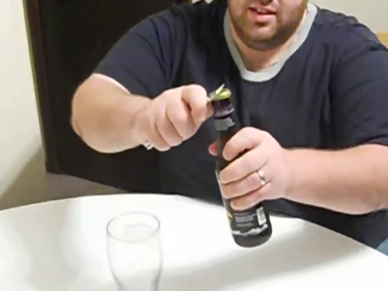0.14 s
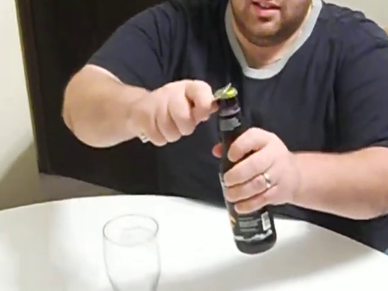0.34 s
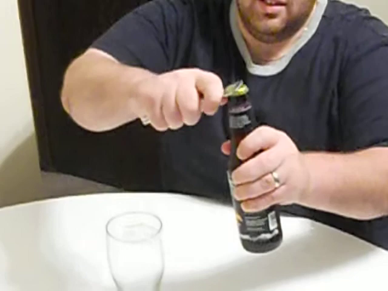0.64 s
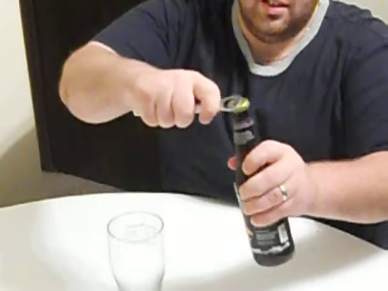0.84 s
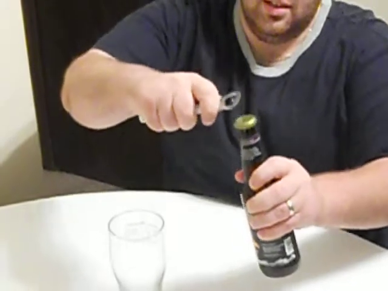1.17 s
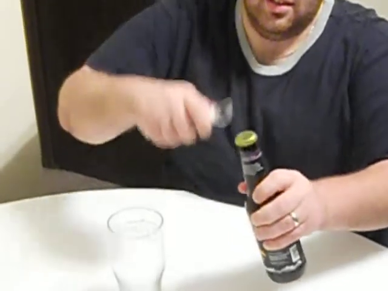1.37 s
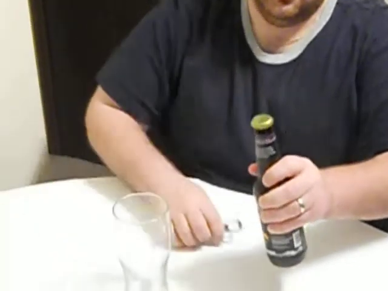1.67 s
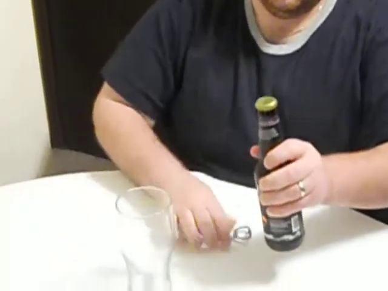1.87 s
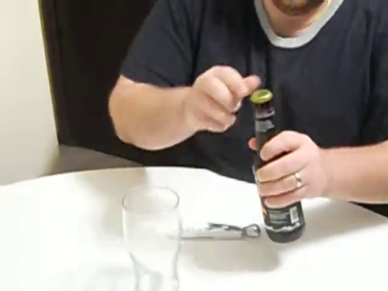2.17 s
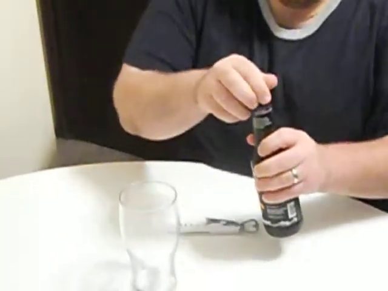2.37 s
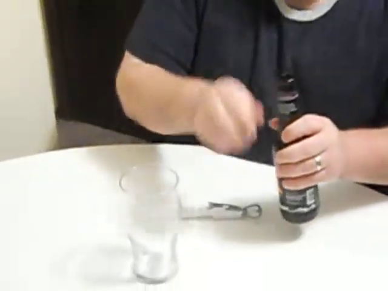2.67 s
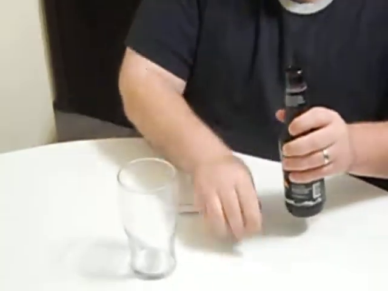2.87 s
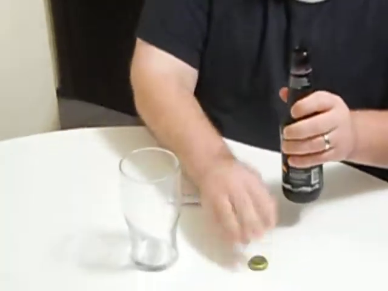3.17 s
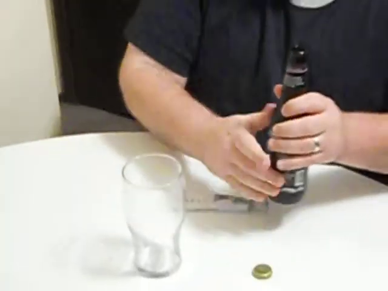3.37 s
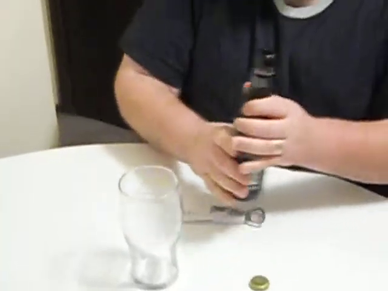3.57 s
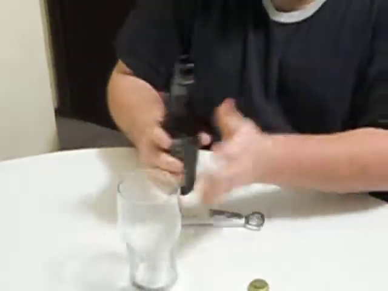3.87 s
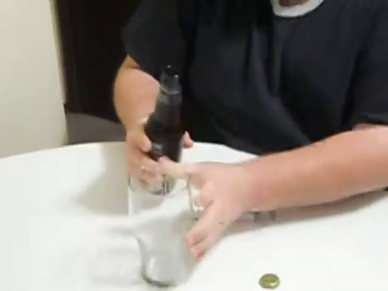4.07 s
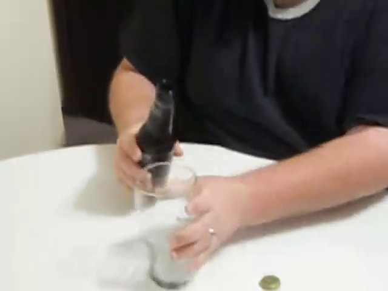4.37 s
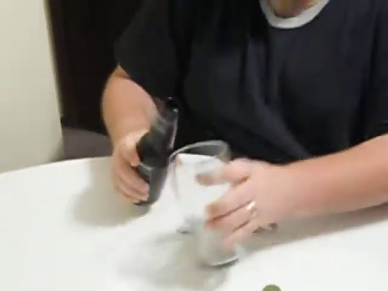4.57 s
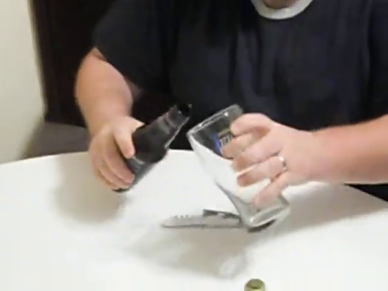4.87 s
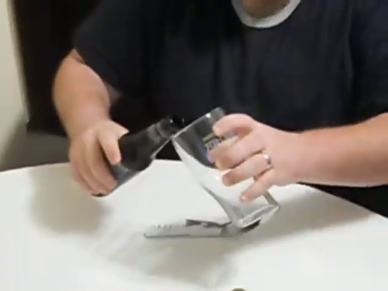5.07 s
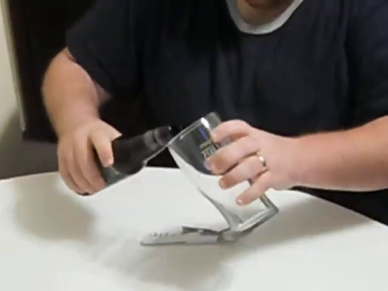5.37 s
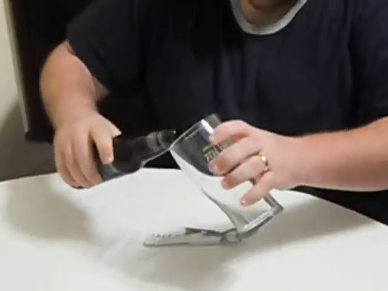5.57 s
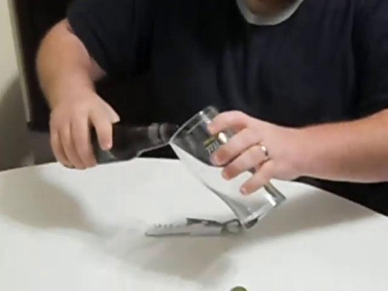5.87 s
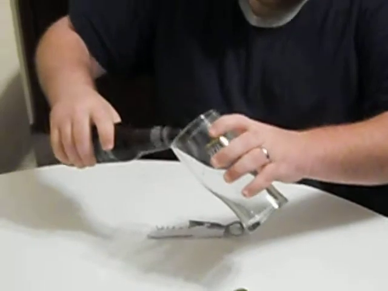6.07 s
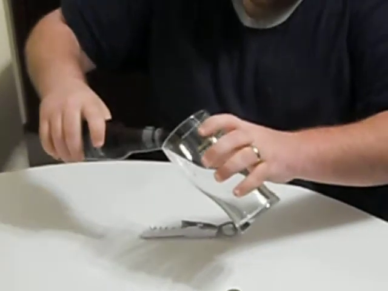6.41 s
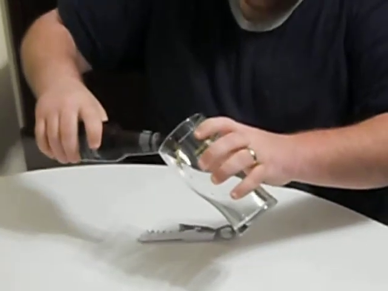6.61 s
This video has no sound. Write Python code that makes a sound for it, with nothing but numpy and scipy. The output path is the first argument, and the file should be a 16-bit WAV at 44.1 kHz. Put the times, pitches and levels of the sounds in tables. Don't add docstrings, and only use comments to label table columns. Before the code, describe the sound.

Close in a small hard room, gas hisses from a bottle in a slow leak, then a sharper burst, followed by a metallic snap and small hollow pop. The steel opener clacks loudly on the table twice, the cap lands with bright bouncing tinks, a glass scrapes faintly, bottle neck clinks on its rim, and a very faint trickle begins over hum and hiss.

```python
import sys
import numpy as np
from scipy import signal
from scipy.fft import rfft, irfft, next_fast_len
from scipy.io import wavfile
from scipy.ndimage import uniform_filter1d

SR = 44100
rng = np.random.default_rng(int(sys.argv[2]) if len(sys.argv) > 2 else 0)


def pcm_store(signal):
    levels = np.round(np.clip(np.atleast_2d(signal), -1, 1) * 32767)
    wavfile.write(sys.argv[1], SR, levels.astype(np.int16).T)


def ratio_of_db(decibels):
    return 10 ** (np.asarray(decibels, float) / 20)


N = 297366

# (time [s], level [dB])
LEAK = [(0, -55), (.01, -27.5), (.039, -29), (.043, -21), (.102, -24.5), (.2, -22), (.238, -19),
        (.356, -27.5), (.39, -37)]
# (time [s], level [dB])
BURST = [(.401, -44), (0.41, -19), (.437, -11.5), (.47, -15), (.51, -41), (.54, -68)]
# (frequency [Hz], density [dB per Hz])
GAS_COLOUR = [(410, -54.5), (700, -24), (1780, -18.5), (2520, -23.5), (5010, -11), (5360, -13), (6420, -10),
              (6870, -10.5), (7350, -9.5), (10300, -5.5), (13400, -33), (22000, -120)]
# (frequency [Hz], width [Hz], level over the jet [dB])
NECK_PIPE = [(1682, 350, 3), (5000, 170, 1.5), (5740, 210, 5), (6430, 250, 3.5), (7335, 380, 9.5),
             (8170, 350, 4), (8940, 200, 5), (9670, 220, 2.5), (10440, 290, 9), (11570, 160, 2)]
LEAK_TILT_DB, LEAK_DULLEST_S, LEAK_BRIGHTENS_DB_PER_S = -1.5, 0.14, 27.5
BURST_TILT_DB = 1.5

# (time [s], first pitch [Hz], last pitch [Hz], level [dB], hold [s])
POP = [
    (0.725, 735, 863, -17.5, 0.016),
    (0.776, 1030, 890, -32, 0.023),
    (1.001, 859, 806, -40, 0.019),
]
POP_ATTACK_S, POP_FALL_DB_PER_S = 0.0052, 941.5

# (time [s], peak [dB], contact [ms], ring over crack [dB], tilt [dB per octave])
LEVER_CONTACTS = [(.7232, -11, 9.3, -8, 0.5), (.7258, -9.5, 4.3, 8.5, -5), (.7328, -9, 3.64, -21, 1),
                  (.7355, -4, 1.6, -9, 2.5), (.7474, -26, 3.4, -17, 13), (.7775, -16, 3.5, 1, 19),
                  (.8005, -14.5, 2.8, 15, -8)]
PRISE_CONTACTS = [(.7895, -15.5, 8.4, -4, -0.5), (.7945, -18, 12, 4, 4), (.8005, -9.5, 4.9, 12, 9),
                  (.8074, -18, 2.1, -3, 5), (.815, -15, 2.4, -9, 0)]
SETTLE_CONTACTS = [(.9957, -30.5, 2.8, 2, -0.5), (1.019, -27.5, 2, 10, 2.5), (1.0394, -31.5, 3.4, 8, 1)]
OPENER_CONTACTS = [(1.5765, -26.5, 4.3, -23, 3), (1.6368, -12, 2, -11.5, -0.7),
                   (1.6465, -16, 0.59, -11, -4.5), (1.701, -27, 23, -11, -8.5),
                   (1.7085, -20.5, 5.4, 2, 2.5), (1.7178, 2.5, 0.65, -28, 4), (1.7205, -5, 1.9, -8, 12.5),
                   (1.7265, -10.5, 3.1, -29.5, 5), (1.7415, -40.5, 1.4, -6, 5),
                   (1.8472, 1.5, 1.2, -36, 2.5), (1.850, 3.5, 2.3, -26, 5.5), (1.853, -7.5, 2.3, -37.5, -2),
                   (1.8605, -11, 1.4, -29, -3.5), (1.8765, -11, 2, -5, 6.5)]
CAP_CONTACTS = [(3.0856, 1.5, .05, 22, -6), (3.0957, -1.5, .05, 18, -2), (3.1046, -6, .05, 16, -3),
                (3.1114, -15, .3, 9, 3), (3.1368, -11, .08, 3, 12), (3.1528, -14, .08, 5, 8),
                (3.1604, -21, .1, 4, 3), (3.168, -24, .1, 4, 0), (3.1774, -26, .1, 5, 0),
                (3.19, -28, .1, 16, 4)]
DRAG_CONTACTS = [(4.2305, -20.5, 3.3, -6, 1), (4.2395, -19.5, 4.7, -10, -3), (4.246, -20.5, 2.7, -2, -7),
                 (4.258, -23, 6.2, -18, -3.5), (4.271, -26.5, 7.9, -1, 2.5), (4.298, -32, 6.1, -8, 2),
                 (4.307, -29, 4.6, -2, -11), (4.329, -34, 6.9, -10, -8)]
CLINK_CONTACTS = [(5.2558, -9, 2.5, 5, 0), (5.263, -11.5, 3.2, 1, -1), (5.269, -9.5, 3.8, 3, 0),
                  (5.2745, -11, 4, 1, -1), (5.281, -15, 4.6, 2, -2), (5.293, -19, 5, 6, -1),
                  (5.3445, -23, 6, 8, -2)]

# (frequency [Hz], level [dB], t60 [s])
LEVER_MODES = [(2450, -13, .05), (3050, -5, .12), (3163, 0, .05), (3280, -4, .11), (5529, -9, .05),
               (5850, -12, .05), (6450, -12, .05), (7400, -12, .04), (8250, -11, .08)]
CAP_ON_NECK_MODES = [(3075, -1, .4), (3340, -8, .15), (2466, -16, .2), (4790, -17, .15), (4990, -9, .13),
                     (5400, -18, .14), (6440, -18, .08), (8240, -20, .2), (8535, -5, .12), (8915, -2, .2),
                     (9216, -6, .14), (9600, -13, .15), (9880, -18, .13), (10300, -20, .04)]
FREE_CAP_MODES = [(3100, -5, .14), (3400, -6, .04), (4790, -12, .12), (4990, 0, .2), (6200, -6, .06),
                  (8300, -8, .1), (8800, -6, .1), (9250, -9, .08)]
OPENER_MODES = [(1200, -14, .1), (1700, -13, .1), (4350, -10, .06), (5150, -11, .07), (6800, -18, .07),
                (3200, -10, .08), (9950, -14, .08)]
CAP_MODES = [(3560, -34, .2), (4070, -26, .22), (4370, -28, .2), (4580, -19, .22), (4956, 0, .15),
             (4935, -15, .3), (5064, -15, .33), (7275, -29, .2), (8270, -18, .14), (8672, -14, .24),
             (8750, -13, .08), (8850, -23, .15), (10180, -30, .12), (11870, -27, .14)]
TABLE_MODES = [(402, -6, 0.39), (506, -37, 4.15), (649, -1, 0.33), (723, -2, 0.16), (960, -3, 0.3),
               (1136, -18, 0.16), (1450, -2, 0.19), (1610, -35, 5.0)]
GLASS_MODES = [(554, -8, .45), (1352, -1, .6), (1520, -8, .2), (1815, -9, .3), (2094, -10, .3),
               (2509, -9, .3), (2993, -3, .35), (3284, -3, .25), (3430, 2, .33), (4274, -6, .25),
               (4592, -7, .5), (5120, -6, .25), (7144, 2, .16), (8075, -11, .25), (9350, -13, 0.08),
               (1050, -7, 0.15)]

# (frequency [Hz], density [dB per Hz])
PRISE_CRACK = [(240, -57), (400, -33), (811, -8), (1540, -16.5), (2870, -19.5), (3200, 1), (4030, -14.5),
               (8400, -18), (10300, -50.5), (13400, -57), (22000, -120)]
OPENER_CRACK = [(88, -63), (150, -22.5), (509, -8.5), (596, -12), (1660, -8), (2500, -15.5), (4410, -4.5),
                (7100, -7.5), (10300, -16.5), (13400, -44), (22000, -120)]
CAP_CRACK = [(300, -65), (700, -27), (1200, -22.5), (2500, -21.5), (4700, 16), (7000, 9.5), (9000, -8.5)]
TABLE_CRACK = [(71, -74), (120, -13.5), (459, -5), (637, -5), (781, -6), (987, -6.5), (2090, -33),
               (5000, -50), (6500, -70), (11000, -120)]
GLASS_CRACK = [(180, -59), (300, -9), (937, -11), (1380, 10), (2310, -3.5), (3350, -8), (5620, -4),
               (7220, -5), (10300, -14), (13400, -59), (22000, -120)]

# (time [s], peak [dB], centre [Hz])
TICKS = [(1.3467, -38, 5630), (1.397, -37.5, 4840), (1.424, -39, 5000), (1.637, -13.5, 3060),
         (1.645, -22.5, 2550), (1.707, -15, 3550), (2.074, -43, 1070), (3.34, -45, 5000),
         (4.4078, -33.5, 3180), (5.8298, -24.5, 1050), (5.831, -34, 5350), (5.845, -31, 4200),
         (5.899, -30, 2800), (5.888, -41, 3300), (5.908, -23.5, 2500), (5.9078, -20.5, 900),
         (6.5175, -30, 1020)]
# (time [s], peak [dB], centre [Hz])
TINKS = [(0.056, -19, 8600), (1.7175, -16.5, 4140), (2.313, -50.5, 5000), (2.3136, -45, 3280),
         (5.882, -33, 8900)]
# (time [s], peak [dB], pitch [Hz])
GLUGS = [(6.395, -39, 1150)]
# (time [s], peak [dB], centre [Hz], length [ms])
RUBS = [(.0415, -34, 6100, 8.7), (1.2405, -30.5, 2700, 19), (1.251, -29.5, 1070, 11),
        (2.128, -45, 2460, 16), (3.15, -29, 3760, 44), (3.09, -23.5, 1160, 16), (3.099, -17, 4200, 24),
        (1.862, -25, 1500, 15), (3.59, -50, 5960, 32), (4.229, -44, 1500, 25), (4.295, -39, 1600, 20),
        (4.296, -39.5, 4800, 18), (4.372, -35.5, 3600, 15), (4.386, -30.5, 1060, 19),
        (4.396, -40, 1200, 12), (.733, -5, 6570, 4.2), (5.265, -20, 1900, 18), (4.315, -30.5, 600, 18),
        (5.258, -23, 2800, 34), (5.872, -29, 2530, 20), (5.903, -30, 4530, 8)]
# (time [s], peak [dB],
# frequency [Hz], contact [ms], sharpness [Q])
PINGS = [(.7915, -15.5, 5030, 5.5, 41), (3.098, -17.5, 4576, 14, 30), (3.11, -27, 4070, 23, 38),
         (3.155, -27, 4500, 29, 24), (3.165, -35, 3600, 16, 19), (1.8476, -8, 7050, 2.7, 8.6),
         (1.848, -12, 5250, 3.5, 14), (1.848, -19.5, 1500, 4, 3.6), (1.8605, -21, 3650, 2.6, 4.1),
         (1.876, -31, 4900, 2.96, 10), (1.7178, -13, 2950, 1.2, 4), (.7785, -17, 8400, 5, 13),
         (1.7185, -10.5, 4580, 5.3, 5.8), (1.737, -29.5, 4500, 3, 6), (0.056, -10, 7800, .6, 3),
         (4.3075, -26, 328, 3.3, 2.3), (4.259, -26.5, 470, 4, 3.5)]
TICK_MS, TINK_MS, GLUG_MS = 3.7, 10, 11
TICK_Q, TINK_Q, GLUG_Q, RUB_Q = 1.53, 7.1, 14, 0.91

# (time [s], bubble rate [per s], level [dB])
POUR = [
    (5.95, 270, -66),
    (6.1, 480, -62),
    (6.4, 290, -57),
    (6.74, 170, -67),
]

# (frequency [Hz], t60 [s])
ROOM = [(200, 0.29), (1000, 0.33), (4000, 0.23), (8000, 0.24), (12000, 0.061)]
# (frequency [Hz], density [dB per Hz])
HISS = [(180, -31.5), (300, -2.5), (358, -6), (409, -26), (519, -16), (1210, -11.5), (1670, -15.5),
        (9710, -22.5), (10300, -19), (13400, -51.5), (22000, -120)]
# (frequency [Hz], density [dB per Hz])
RUMBLE = [(8.8, -37.5), (15, 9), (91, -4), (134, -9), (168, -7), (233, 3), (267, -14), (363, -0.5),
          (511, -5.5), (900, -13.5), (1170, -49.5), (1980, -120)]
# (frequency [Hz], level over hiss [dB])
HUM = [(120, -12), (240, 2), (360, 4)]
# (frequency [Hz], width [Hz], level over hiss [dB])
FAN = [(138, 14, -4.5), (232.7, 7.7, -5.5), (313, 12, -5), (379, 19, -16.5), (445, 10, -11.5)]
HISS_DB, RUMBLE_OVER_DB = -49.5, 2
# (time [s], depth [dB], hold [s])
DUCKS = [
    (-.6, 3.5, 1.6),
    (.73, 12.5, 0.81),
    (1.85, 19.5, 0.68),
    (3.09, 17.5, 0.73),
]
SINK_S, RECOVER_S = 0.021, 0.14
CREEP_S, CREEP_SHARE = 0.69, 0.63

TOP_HZ = 10300


def gas():
    t = np.arange(N) / SR
    level_db, = in_time(LEAK + BURST + [(.7, -120)])
    leak_tilt_db = LEAK_TILT_DB + LEAK_BRIGHTENS_DB_PER_S * np.abs(t - LEAK_DULLEST_S)
    tilt_db = np.where(t < BURST[0][0], leak_tilt_db, BURST_TILT_DB)
    jet = coloured(GAS_COLOUR)
    for hz, width_hz, db in NECK_PIPE:
        jet = jet + (ratio_of_db(db) - 1) * resonate(jet, hz, width_hz)
    jet = rms_one(jet)
    dull = signal.sosfilt(signal.butter(2, 7500, fs=SR, output="sos"), jet)
    bright = jet - dull
    sputter_db = 0.78 * rms_one(uniform_filter1d(rng.standard_normal(N), size=150))
    return ratio_of_db(level_db + sputter_db) * (ratio_of_db(-tilt_db) * dull + ratio_of_db(tilt_db) * bright)


def pop():
    wobble_db = 2.5 * rms_one(uniform_filter1d(rng.standard_normal(N), size=300))
    out = 0
    for s, first_hz, last_hz, level_db, hold_s in POP:
        hz, = in_time([(s, first_hz), (s + hold_s, last_hz)])
        tone = np.sin(2 * np.pi * np.cumsum(hz) / SR)
        out = out + ratio_of_db(level_db + swell_db(s, POP_ATTACK_S, hold_s, POP_FALL_DB_PER_S)) * tone
    return ratio_of_db(wobble_db) * out


def swell_db(s, attack_s, hold_s, fall_db_per_s):
    t = np.arange(N) / SR - s
    return np.clip(np.minimum(30 * t / attack_s, -fall_db_per_s * (t - hold_s)), -150, 0)


def cap_levered():
    out = strike(LEVER_CONTACTS, LEVER_MODES, PRISE_CRACK, damping=.85, split=0.003, choke_db=6)
    out += strike(PRISE_CONTACTS, CAP_ON_NECK_MODES, PRISE_CRACK, damping=0.78, split=0.003)
    out += strike(SETTLE_CONTACTS, FREE_CAP_MODES, PRISE_CRACK, damping=1, split=.004, choke_db=3)
    return out


def opener_lands():
    return strike(OPENER_CONTACTS, OPENER_MODES, OPENER_CRACK, damping=.22, split=.022)


def cap_lands():
    return strike(CAP_CONTACTS, CAP_MODES, CAP_CRACK, damping=1, split=.0003, choke_db=13)


def glass_dragged():
    return strike(DRAG_CONTACTS, TABLE_MODES, TABLE_CRACK, damping=0.6, split=0.059)


def glass_clinks():
    return strike(CLINK_CONTACTS, GLASS_MODES, GLASS_CRACK, damping=0.56, split=0.003, choke_db=4)


def strike(contacts, modes, crack, damping, split, choke_db=0):
    out, t = np.zeros(N + SR), np.arange(SR // 3) / SR
    hz, level_db, t60_s = np.repeat(np.transpose(modes), 3, axis=1)[:, :, None]
    decays = ratio_of_db(-60 * t / (damping * t60_s))
    no_lows = signal.butter(2, 0.82 * hz.min(), "high", fs=SR, output="sos")
    grid_hz = np.linspace(0, SR / 2, 1025)
    gaps_s = np.diff([row[0] for row in contacts], append=np.inf)
    for gap_s, (s, peak_db, ms, ring_db, tilt_db) in zip(gaps_s, contacts):
        force = rough_force(ms)
        strengths = ratio_of_db(level_db + tilt_db * np.log2(hz / 3000) + rng.normal(0, 2, hz.shape))
        strengths /= np.abs(rfft(force))[(hz * len(force) / SR).astype(int)]
        split_hz = hz * (1 + split * rng.standard_normal(hz.shape))
        rings = strengths * decays * np.sin(2 * np.pi * split_hz * t)
        body = signal.fftconvolve(force, signal.sosfilt(no_lows, rings.sum(0)))
        crack_db = at_hz(crack, grid_hz) + tilt_db * np.log2((grid_hz + 100) / 3000)
        snap = signal.fftconvolve(force, causal_click(crack_db))
        body *= ratio_of_db(ring_db) / np.abs(body).max()
        toward_next = np.clip(np.arange(len(body)) / (gap_s * SR), 0, 1)
        body *= ratio_of_db(-choke_db * toward_next ** 3)
        body[:len(snap)] += snap / np.abs(snap).max()
        add(out, s, peak_db, body)
    return out[:N]


def rough_force(ms):
    t_ms = np.arange(4096) * 1000 / SR
    force = rng.standard_normal(len(t_ms)) * np.exp(-t_ms / np.clip(ms, .05, 30))
    force[0] = 3
    return force


def causal_click(db):
    cepstrum = irfft(db * np.log(10) / 20)
    half = len(cepstrum) // 2
    cepstrum[1:half] *= 2
    return irfft(np.exp(rfft(cepstrum[:half + 1], 2 * half)))


def touches():
    out = np.zeros(N + SR)
    rows = [(*row, TICK_MS, TICK_Q) for row in TICKS]
    rows += [(*row, TINK_MS, TINK_Q) for row in TINKS]
    rows += [(*row, GLUG_MS, GLUG_Q) for row in GLUGS]
    rows += [(*row, RUB_Q) for row in RUBS] + PINGS
    for s, peak_db, hz, ms, q in rows:
        once = resonate(rough_force(ms), hz, hz / q)
        add(out, s, peak_db, resonate(once, hz, hz / q))
    return out[:N]


def pour():
    per_s, level_db = in_time([(0, 0, -120), (5.9, 0, -120)] + POUR)
    sizes = ratio_of_db(4.0 * np.minimum(rng.exponential(1, N), 4)) * (rng.random(N) < per_s / SR)
    pitch_index = rng.integers(0, 16, N)
    rings = 0
    for k, hz in enumerate(np.geomspace(250, 1800, 16)):
        rings = rings + resonate(sizes * (pitch_index == k) + 1e-18, hz, hz / 9)
    return ratio_of_db(level_db) * rings / np.std(rings[6 * SR:])


def room(x):
    t, tail = np.arange(SR // 2) / SR, 0
    for low_hz in 100 * 2 ** np.arange(0, 7.5, .5):
        half_octave = signal.butter(2, [low_hz, low_hz * 2 ** .5], "band", fs=SR, output="sos")
        band = signal.sosfilt(half_octave, rng.standard_normal(len(t)))
        tail = tail + band * ratio_of_db(-60 * t / at_hz(ROOM, low_hz * 1.27))
    tail *= np.clip(t / 0.003, 0, 1)
    return signal.fftconvolve(x, tail / np.sqrt(np.sum(tail ** 2)))[:N]


def background():
    white, t = rng.standard_normal(N), np.arange(N) / SR
    drone = sum(ratio_of_db(db) * rms_one(resonate(white, hz, width_hz)) for hz, width_hz, db in FAN)
    hum = sum(ratio_of_db(db) * np.sin(2 * np.pi * hz * t) for hz, db in HUM)
    gain = ratio_of_db(HISS_DB + auto_gain_db())
    hiss = ratio_of_db(10.5) * coloured(HISS)
    lows = ratio_of_db(6.0) * coloured(RUMBLE) + drone + hum
    return gain * (hiss + ratio_of_db(RUMBLE_OVER_DB) * lows)


def auto_gain_db():
    s, depth_db, hold_s = np.transpose(DUCKS)[:, :, None]
    since_s = np.clip(np.arange(N) / SR - s, 0, None)
    free_s = np.clip(since_s - hold_s, 0, None)
    left = (1 - CREEP_SHARE) * np.exp(-free_s / RECOVER_S) + CREEP_SHARE * np.exp(-free_s / CREEP_S)
    return -np.max(depth_db * (1 - np.exp(-since_s / SINK_S)) * left, axis=0)


def in_time(rows):
    s, *columns = np.transpose(rows)
    return [np.interp(np.arange(N) / SR, s, c) for c in columns]


def at_hz(points, hz):
    point_hz, value = np.transpose(points)
    return np.interp(np.log(np.clip(hz, 1, TOP_HZ)), np.log(point_hz), value)


def rms_one(x):
    return x / np.sqrt(np.mean(x ** 2) + 1e-20)


def coloured(spectrum):
    white = rfft(rng.standard_normal(next_fast_len(N)))
    hz = np.linspace(0, SR / 2, len(white))
    return rms_one(irfft(white * ratio_of_db(at_hz(spectrum, hz)))[:N])


def resonate(x, hz, width_hz):
    r = np.exp(-np.pi * width_hz / SR)
    poles = [1, -2 * r * np.cos(2 * np.pi * hz / SR), r * r]
    return signal.lfilter([(1 - r * r) / 2, 0, (r * r - 1) / 2], poles, x)


def add(out, s, peak_db, sound):
    out[round(s * SR):][:len(sound)] += ratio_of_db(peak_db) * sound / np.abs(sound).max()


def scene():
    near = gas() + pop() + pour() + touches()
    near += cap_levered() + opener_lands() + glass_dragged() + glass_clinks()
    near = near / (1 + np.abs(near / .66) ** 8) ** (1 / 8)
    cap = cap_lands()
    wet = room(near + ratio_of_db(-7) * cap)
    return (near + cap + ratio_of_db(-10.0) * wet + background())[None]


def roll_off(x):
    return signal.sosfilt(signal.butter(12, 16770, fs=SR, output="sos"), x)


def record(dry):
    main = signal.sosfilt(signal.cheby2(9, 40, 11300, fs=SR, output="sos"), dry)
    top = signal.sosfilt(signal.butter(2, [10900, 11850], "band", fs=SR, output="sos"), dry)
    x = signal.sosfilt(signal.ellip(10, .5, 60, 12380, fs=SR, output="sos"), main + ratio_of_db(-17) * top)
    x = x / (1 + np.abs(x / .79) ** 60) ** (1 / 60)
    x = signal.sosfilt(signal.ellip(8, .5, 70, 16600, fs=SR, output="sos"), x)
    return roll_off(x)


dry = scene()
out = record(dry)
pcm_store(out)
```